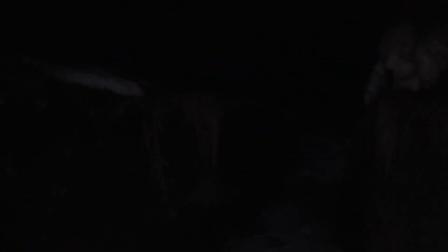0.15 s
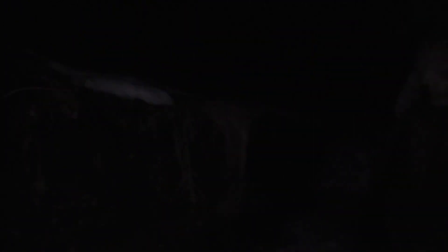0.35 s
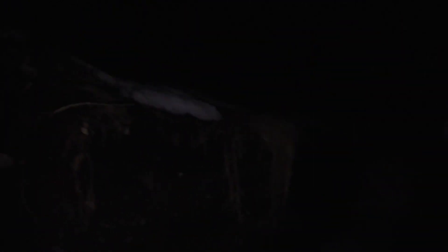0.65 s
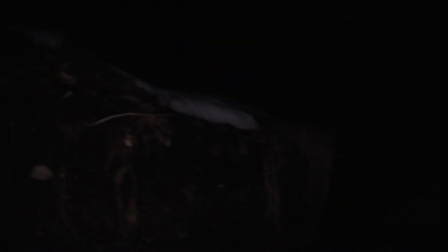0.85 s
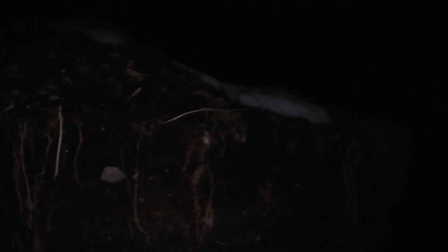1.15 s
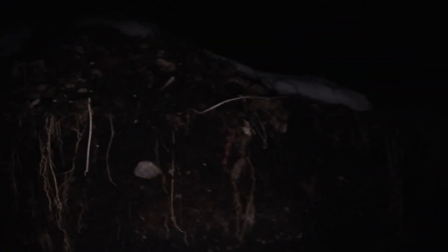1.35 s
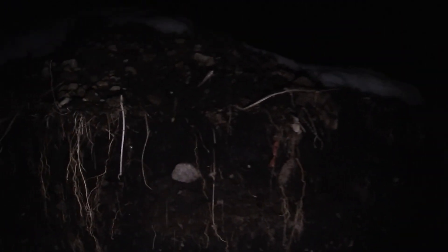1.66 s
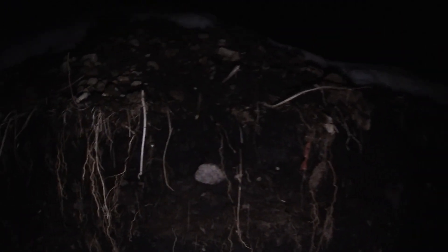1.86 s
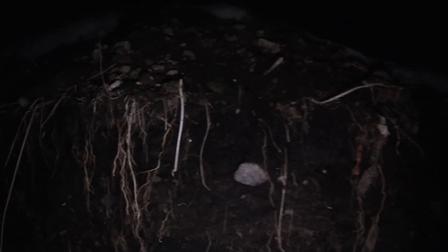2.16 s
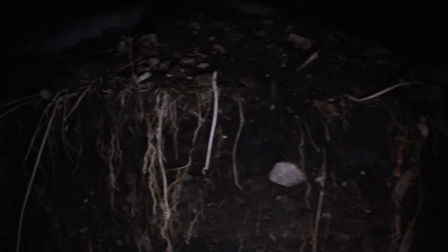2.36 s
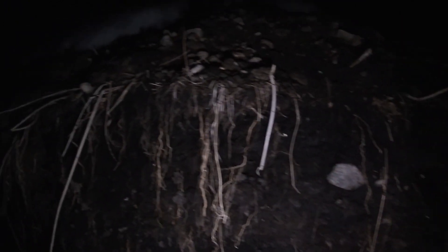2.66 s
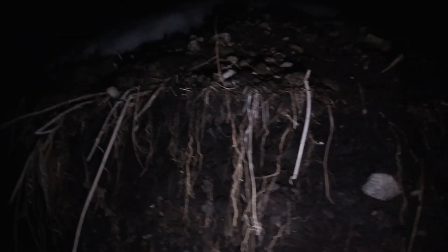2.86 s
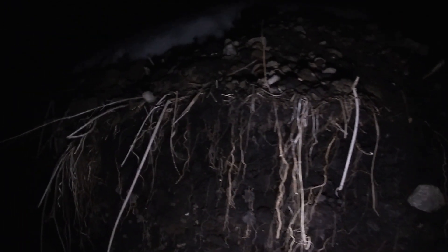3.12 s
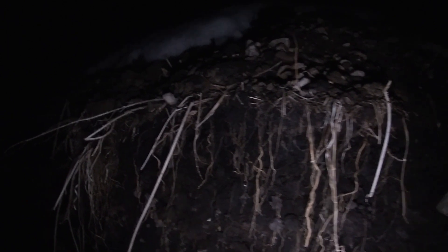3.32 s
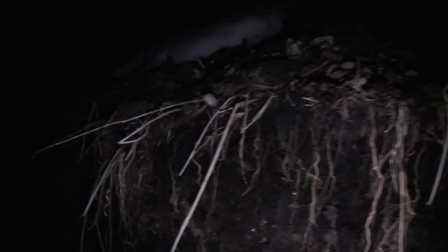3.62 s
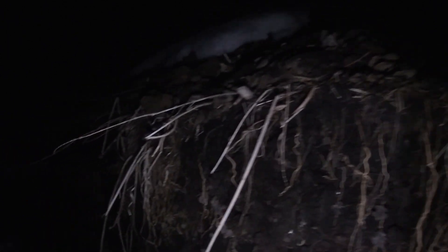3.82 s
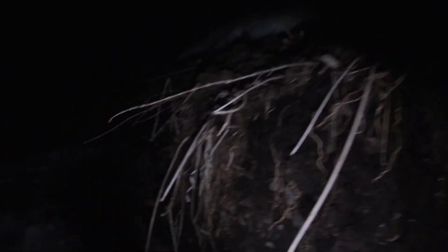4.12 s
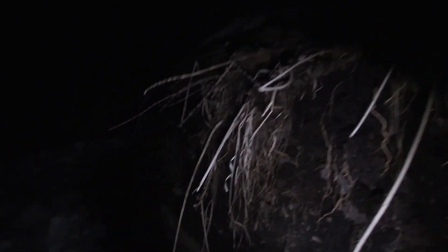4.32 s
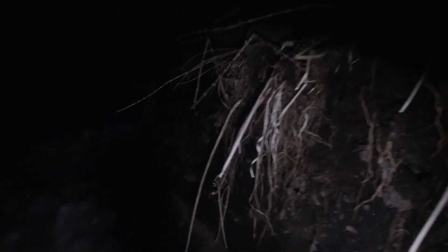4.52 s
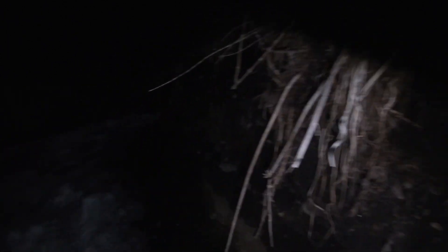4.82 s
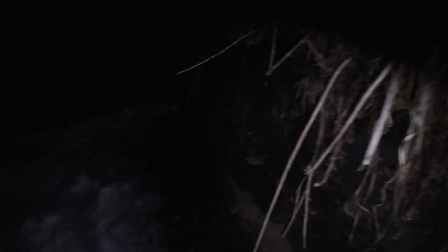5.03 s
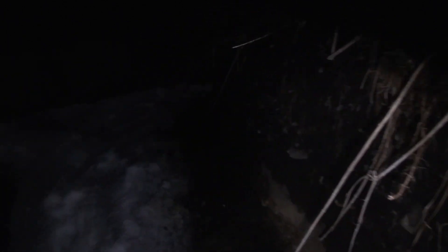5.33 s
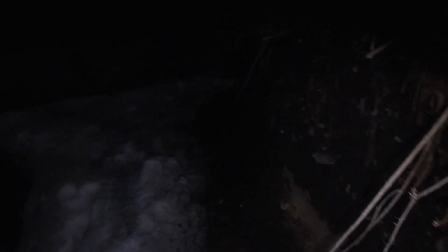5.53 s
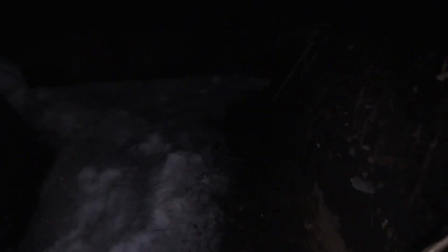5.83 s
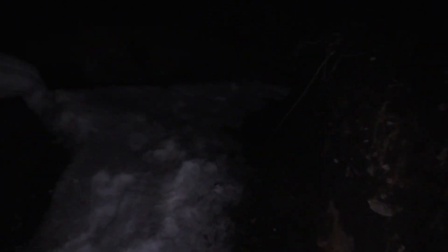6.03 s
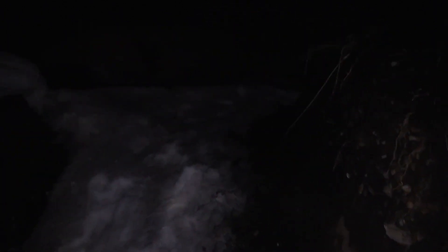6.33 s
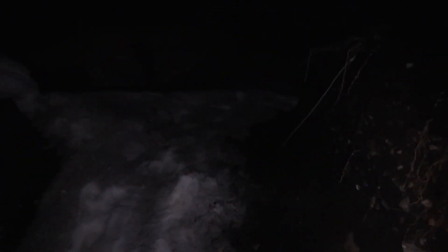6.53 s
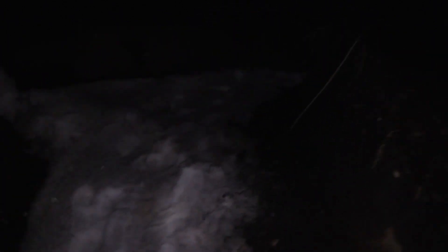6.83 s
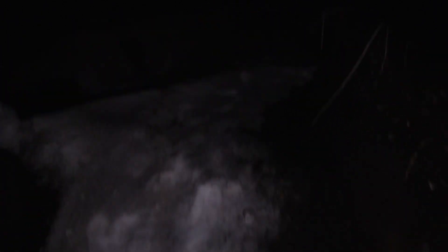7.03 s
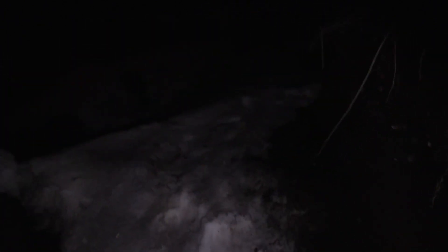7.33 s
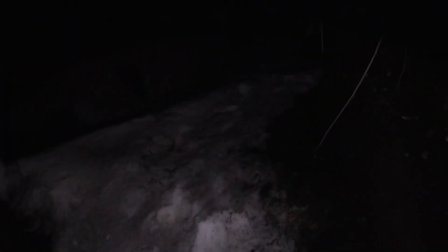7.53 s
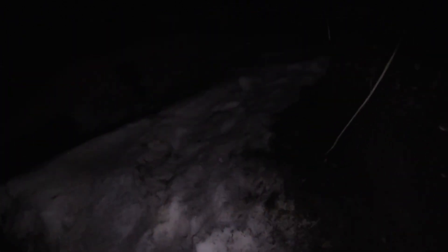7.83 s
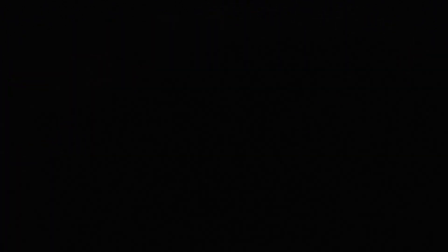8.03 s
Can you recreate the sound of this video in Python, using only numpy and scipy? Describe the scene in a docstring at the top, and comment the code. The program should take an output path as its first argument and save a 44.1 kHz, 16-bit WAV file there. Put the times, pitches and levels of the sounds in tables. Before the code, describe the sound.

Plastic taps, creaks and cloth rubs dominate, bunching into hard knocks past six seconds, before a boot crunches crust with brief hollow pops.

```python
"""A soft rub of fabric on plastic, then a creaking grip and the first taps: someone walks over snow and
frozen dirt with a small recorder in hand. Rubs, taps and creaks are clicks and grains of noise that excite
the modes of the plastic housing; thuds and hollow knocks are decaying sines and sway is low rumbling noise.
Boots crush the crust in bursts of banded grains, with ringing pops where hollows cave in.
A faint, patchy hiss of banded noise lies beneath; both channels carry the same sound."""
import sys
import numpy as np
from scipy import signal
from scipy.io import wavfile

SR = 44100
rng = np.random.default_rng(int(sys.argv[2]) if len(sys.argv) > 2 else 0)


def persist_wave(psi):
    """Save psi, clipped to +-1, as 16-bit WAV."""
    counts = np.round(np.clip(psi, -1, 1) * 32767).astype(np.int16)
    wavfile.write(sys.argv[1], SR, np.atleast_2d(counts).T)


N = 360341   # length in samples

# Strokes of fabric on the housing. Each row: start in seconds, swell in seconds, hold in seconds,
# ease in seconds, hold level in dB, press (shell part) in dB, grit (edge part) in dB, contact colour in Hz.
FABRIC_STROKES = [(0.1, 0.22, 0.024, .12, -57, 12, 2.5, 7800), (0.95, .01, 0.11, 0.083, -62.5, 1, -5, 4160),
                  (1.88, 0.3, 0.04, 0.2, -51, -20, -4.5, 4800),
                  (2.55, 0.33, 0.07, 0.07, -42.5, -7.5, -2.5, 5350),
                  (3.7, 0.058, 0.066, 0.07, -59, -7.5, 4.5, 4250),
                  (3.9, 0.065, 0.17, 0.012, -57, -1.5, -0.8, 4330),
                  (4.13, 0.062, 0.17, 0.01, -50, -1.5, 1.5, 5700),
                  (4.365, 0.015, 0.089, 0.072, -47.5, -1.5, -3, 5700),
                  (4.735, 0.0085, 0.06, 0.017, -51.5, 7.5, 1.1, 5570),
                  (4.97, 0.082, 0.054, 0.031, -58.5, -11, 2, 7600),
                  (5.155, 0.07, 0.022, 0.028, -49.5, 5.5, 0, 3650),
                  (5.795, 0.011, 0.12, 0.004, -53, 1, 4, 4250),
                  (5.915, 0.018, 0.011, 0.029, -48, -2.5, 5.5, 4250),
                  (5.975, 0.0055, 0.14, 0.012, -52.5, -4.5, 0.5, 5900),
                  (6.1, 0.0023, 0.0039, 0.055, -51, 1.5, 5.5, 4170),
                  (6.28, 0.007, .01, 0.13, -50.5, 4, 7, 4250),
                  (6.41, 0.0034, 0.0073, 0.037, -42, 6, 1.5, 4130),
                  (6.56, 0.0097, 0.027, 0.094, -62, 2, 16.5, 2940),
                  (6.645, 0.0051, 0.0051, 0.2, -43.5, 3, 3.5, 4160),
                  (6.82, 0.035, 0.046, 0.035, -49, 0.5, 6, 4500),
                  (7.13, 0.024, 0.044, 0.011, -50, 4.5, -5, 5900),
                  (8.1, 0.006, 0.063, 0.013, -56, -8, -0.5, 5600)]
RUB_SWELL_DB_PER_S, RUB_EASE_DB_PER_S = 95.5, 88   # slopes before and after the hold
SHELL_TOP_HZ, KNOCK_TOP_HZ = 400, 2000   # shell below the first, panels between, edges above


def rubbing():
    """Dense stick-slip of fabric on plastic: thousands of fibre clicks heard through the housing modes."""
    friction, press_db, grit_db, contact_hz = strokes(
        FABRIC_STROKES, RUB_SWELL_DB_PER_S, RUB_EASE_DB_PER_S, fade_s=0.0024)
    fibres = grains(4000, spread_db=2.0, clump_db=2.0, clump_hz=33.0)
    shell, knock, edge = housing([fibres] * 3, contact_hz, focus_db=8.5, grip_db=1.72, focus_octaves=0.095)
    body = from_db(press_db) * rms_one(shell)
    grit = from_db(grit_db) * rms_one(edge)
    return friction * (body + rms_one(knock) + grit)


def taps():
    """Each tap, snag or slip is a click with brief chatter; the shell is pushed more softly and later."""
    # Taps on the housing. Each row: start in seconds, strike in dB, shell push beside the strike in dB,
    # contact colour in Hz, chatter decay in seconds.
    tap_rows = [(0.4666, -36.5, -4, 2880, 0.0093), (0.6616, -36, -6, 4440, 0.0049),
                (0.8349, -28.5, -11.5, 4360, 0.0035), (0.9276, -28, -10.5, 4200, 0.0047),
                (1.071, -26.5, -12.5, 4480, 0.003), (1.7897, -10, -40.5, 4530, 0.0078),
                (1.832, -8, -74, 4700, 0.0015), (3.0807, -19, -12.5, 4050, 0.0035),
                (3.2999, -9, -29.5, 4600, 0.0059), (3.6884, -21.5, -16, 4300, 0.006),
                (4.2534, -21, -22, 4690, 0.0072), (5.7977, -17.5, -29, 4250, 0.0052),
                (6.4224, -22, -10.5, 3500, 0.0015), (6.4974, -6.5, -44, 5400, 0.0038),
                (6.6515, -7, -48, 4080, 0.017), (6.6876, -11, -27.5, 3830, 0.0062),
                (7.213, -16, -17.5, 3880, 0.0032), (7.356, -21.5, -53, 7060, 0.022),
                (7.75, -21, -24, 4770, 0.0032), (8.015, -25.5, -29, 2500, 0.014),
                (8.0796, -25, -26, 2760, 0.0057), (8.104, -11, -36, 5470, 0.0049)]
    # Threads that snag and let go with a faint tick. Each row: start in seconds, strike in dB.
    snag_rows = [(0.4369, -29.5), (0.696, -41.5), (1.0207, -44), (2.1935, -33), (2.438, -38), (3.2377, -33),
                 (6.967, -33)]
    snag_push_db, snag_hz, snag_chatter_s = -18.5, 2270, 0.0062
    panel_db, panel_follows = 22.5, 0.42   # panel drive over the strike; its share of the shell push in dB

    snags = [(at, db, snag_push_db, snag_hz, snag_chatter_s) for at, db in snag_rows]
    contacts = sorted(list(tap_rows) + slips() + snags)
    start, edge_db, push_db, contact_hz, chatter_s = np.transpose(contacts)
    shell_db = edge_db + push_db
    knock_db = edge_db + panel_db + panel_follows * push_db

    length = 1500   # samples in one contact
    t = np.arange(length) / SR
    decay = np.exp(-t / np.maximum(chatter_s, 3e-4)[:, None])
    chatter = rng.standard_normal((len(start), length)) * decay * 0.18
    chatter[:, 0] = np.minimum(0.004 / chatter_s, 1)   # long chatter starts less sharply
    push = rms_one(t * np.exp(-t / 0.0017))

    drives = np.full((3, N + length), 1e-18)
    for k, at in enumerate(np.round(start * SR).astype(int)):
        drives[0, at:at + length] += from_db(shell_db[k]) * push
        drives[1, at:at + length] += from_db(knock_db[k]) * chatter[k]
        drives[2, at:at + length] += from_db(edge_db[k]) * chatter[k]
    drives[1] = signal.lfilter([.08], [1, -.93], drives[1])   # panels feel a softer contact than edges
    drives[1] += from_db(14.5) * drives[0]   # and bend with the shell push

    latest = np.maximum(np.searchsorted(start, np.arange(N) / SR + 1e-4) - 1, 0)   # contact now heard
    above_shell = signal.butter(2, SHELL_TOP_HZ, "high", fs=SR, output="sos")
    direct = from_db(-19.5) * signal.sosfilt(above_shell, drives[1, :N])
    ringing = housing(drives[:, :N], contact_hz[latest], focus_db=17.0, grip_db=1.5, focus_octaves=0.14)
    return direct + sum(ringing)


def slips():
    """The grip creaks as a row of slips at its own pace, strongest in the middle; returns rows for taps."""
    # Creaks of the grip. Each row: first slip in seconds, end of the run in seconds, slips per second,
    # unevenness from 0 to 1, loudest strike in dB, shell push beside the strike in dB, chatter in seconds.
    creak_rows = [(0.301, 0.42, 88, .45, -26.5, -10.5, 0.0021),
                  (7.162, 7.202, 130, .06, -14, -20.5, 0.0012)]
    ends_db, slip_hz = -9.5, 4220   # softening toward the ends of a run; contact colour
    rows = []
    for first, last, per_s, uneven, db, push_db, chatter_s in creak_rows:
        gaps = 1 + uneven * rng.uniform(-1, 1, 30)
        times = first + np.append(0, np.cumsum(gaps)) / per_s
        for at in times[times <= last]:
            from_middle = 2 * (at - first) / (last - first) - 1
            rows.append((at, db + ends_db * from_middle ** 2, push_db, slip_hz, chatter_s))
    return rows


def housing(drives, contact_hz, focus_db, grip_db, focus_octaves):
    """Shell, panel and edge modes of the plastic; the shifting grip frees or damps each one in turn."""
    # Modes of the housing. Each row: centre in Hz, width of one resonator pass in Hz, level in dB.
    modes = [(125, 158, -4), (183.3, 60, 9), (238, 190, -3.5), (451.5, 166, -10.5), (712, 144, 0),
             (1034, 360, -8), (1391, 333, 3.5), (2200, 990, -6.5), (2870, 455, -3.5), (3650, 490, 0.2),
             (4267, 470, -6), (5060, 480, -3), (5554, 430, -5), (6307, 1010, -1), (7790, 810, -6),
             (9250, 1640, -15.5), (12400, 11000, -28.5)]
    parts = [0, 0, 0]
    for k, (hz, width_hz, level_db) in enumerate(modes):
        part = part_of(hz)
        gain = from_db(level_db + grip_db * drift(2.3))
        ring = (-1) ** k * gain * resonance(drives[part], hz, width_hz)
        if part == 2:   # edge modes near the contact colour ring most
            octaves_off = np.log2((contact_hz + 1) / hz)
            ring = ring * from_db(focus_db * np.exp(-(octaves_off / focus_octaves) ** 2))
        parts[part] = parts[part] + ring
    return parts


def thuds_and_knocks():
    """Each thud or knock of the housing is a decaying sine that builds quickly."""
    # Low thuds and short hollow knocks of the housing. Each row: start in seconds, level in dB,
    # pitch in Hz, 60 dB decay in seconds (0.03 at least).
    thud_rows = [(0.33, -31.5, 63, 0.3), (2.83, -40.5, 59.7, 0.32), (3.684, -27.5, 52.7, 0.25),
                 (4.1, -32.5, 256, 0.087), (4.253, -27, 267, 0.033), (4.745, -34.5, 44, 0.24),
                 (4.849, -36.5, 26.1, 0.7), (5.328, -37.5, 200, 0.074), (5.806, -34, 60.5, 0.15),
                 (6.107, -14, 61.5, 0.17), (6.288, -18.5, 72, 0.094), (6.415, -18, 103, 0.086),
                 (6.437, -13, 61, 0.1), (6.513, -12, 38.5, 0.073), (7.117, -23, 43, 0.15)]
    out, t = np.zeros(N), np.arange(SR // 3) / SR
    for start, level_db, hz, t60 in thud_rows:
        onset = 1 - np.exp(-t * hz / 0.75)
        decay = from_db(level_db - 60 * t / max(t60, .03))
        at = round(start * SR)
        out[at:at + len(t)] -= np.sin(2 * np.pi * hz * t) * onset * decay
    return out


def crunch():
    """Boots break fine ice crystals by the thousand; fewer clods and pores give way under them."""
    # Boots in crust and dirt. Each row: start in seconds, swell in seconds, hold in seconds,
    # ease in seconds, hold level in dB, weight (low part) in dB, grit (high part) in dB.
    boot_rows = [(1.35, 0.047, 0.0067, 0.035, -42, -2.5, 6.5), (1.437, 0.035, 0.035, 0.013, -44.5, 4, 5.5),
                 (1.525, 0.003, 0.021, 0.067, -50, 1.5, -1.5), (1.607, 0.02, 0.055, 0.011, -51.5, -7, -3.5),
                 (1.72, 0.0065, .11, 0.02, -57, 0, 0), (3.23, 0.013, 0.15, 0.067, -56, -7, -3.5),
                 (3.43, 0.015, 0.28, .01, -60, -14, -4), (5.56, 0.021, 0.024, 0.032, -49.5, -7, 0),
                 (5.64, 0.0053, 0.2, 0.015, -57, -2, -3), (6.94, 0.013, 0.087, 0.17, -49, -13, -1.5),
                 (7.23, 0.018, 0.36, 0.1, -57, -16, -1), (7.664, 0.022, 0.046, 0.0067, -34.5, -1, -7),
                 (7.777, 0.0022, 0.093, 0.014, -46, -8, -5),
                 (7.866, 0.0013, 0.0082, 0.0072, -41.5, 0, -3.5)]
    # Colour of the breaking crust. Each row: frequency in Hz, relative level in dB per Hz.
    crust_colour = [(100, -65), (152, -19.5), (367, -11), (620, -16.5), (1000, -10), (1400, -15.5),
                    (2400, -12.5), (4000, -16), (7510, -13), (10500, -49), (15000, -27)]
    swell_db_per_s, ease_db_per_s = 281, 149
    crushing, weight_db, grit_db = strokes(boot_rows, swell_db_per_s, ease_db_per_s, fade_s=.005)
    crystals = grains(3000, spread_db=1.5, clump_db=2.0, clump_hz=82.0)
    clods = grains(300, spread_db=3.0, clump_db=2.5, clump_hz=35.7) + 0.91 * crystals
    low, middle, high = coloured([clods, clods, crystals], crust_colour, patchy_db=2.44)
    weight = from_db(weight_db) * rms_one(low)
    grit = from_db(grit_db) * rms_one(high)
    return crushing * (weight + rms_one(middle) + grit)


def pops():
    """Hollows in the crust cave in under the boot: each snaps and rings briefly near one pitch."""
    # Caving hollows. Each row: start in seconds, level in dB.
    pop_rows = [(7.725, -24), (7.734, -21.5), (7.781, -27), (7.797, -30), (7.81, -32), (7.845, -30),
                (7.867, -19)]
    hollow_hz, hollow_t60_s, snap_db = 870, 0.02, -11.5   # the ring; the snap of ice beside it
    out, t = np.zeros(N), np.arange(SR // 20) / SR
    for start, level_db in pop_rows:
        chance = rng.standard_normal(len(t))
        hz = hollow_hz * (1 + 0.068 * chance[0])
        fade = from_db(-60 * t / hollow_t60_s) * np.minimum(t * hollow_hz, 1)
        ring = np.sin(2 * np.pi * hz * t) * fade
        snap = from_db(snap_db) * rms_one(resonance(chance, 1700, 3600)) * np.exp(-t / 0.0009)
        at = round(start * SR)
        out[at:at + len(t)] += from_db(level_db) * (ring + snap)
    return out


def sway():
    """Lumpy low pressure on the microphone from the carrying hand; pressing strokes shake it more."""
    # Rumble of the carrying hand, joined by straight lines. Each row: time in seconds, level in dB.
    rumble_points = [(0.0, -64), (0.41, -66), (1.59, -73), (5.96, -55.5), (6.32, -37), (7.78, -67),
                     (8.17, -50.5)]
    lump_band = signal.butter(3, [15, 55], "band", fs=SR, output="sos")
    lumps = signal.sosfilt(lump_band, rng.standard_normal(N))
    time_s, level_db = np.transpose(rumble_points)
    carrying_db = np.interp(np.arange(N) / SR, time_s, level_db) + 1.4 * drift(3.7)
    carrying = from_db(carrying_db) * rms_one(lumps)

    friction, press_db = strokes(FABRIC_STROKES, RUB_SWELL_DB_PER_S, RUB_EASE_DB_PER_S, fade_s=0.043)[:2]
    shake_band = signal.butter(2, [20, 90], "band", fs=SR, output="sos")
    shakes = signal.sosfilt(shake_band, rng.standard_normal(N))
    return carrying + friction * from_db(press_db - 10.5) * rms_one(shakes)


def faint_hiss():
    """Steady noise split into bands that flicker one by one."""
    # Colour of the hiss. Each row: frequency in Hz, relative level in dB per Hz.
    hiss_colour = [(90, -29), (166, 4), (553, -10.5), (728, -1.5), (1340, -5.5), (2330, -13.5),
                   (5770, -10.5), (7750, -14), (14000, -42)]
    noise = rng.standard_normal(N)
    return from_db(-64) * rms_one(sum(coloured([noise] * 3, hiss_colour, patchy_db=4.0)))


def strokes(rows, swell_db_per_s, ease_db_per_s, fade_s):
    """Gain swells, holds, eases, then stops and leaves a faint settling; other columns hold per stroke."""
    start, swell_s, hold_s, ease_s, hold_db, *columns = np.transpose(rows)
    t = np.arange(N) / SR
    k = np.maximum(np.searchsorted(start, t) - 1, 0)   # latest stroke at each sample
    held = t - (start + swell_s)[k]   # negative during the swell
    swell_db = swell_db_per_s * np.minimum(held, 0)
    ease_db = ease_db_per_s * np.maximum(held - hold_s[k], 0)
    sounding = (t >= start[k]) * (held <= (hold_s + ease_s)[k])
    gain = from_db(hold_db[k] + swell_db - ease_db) * sounding
    settling = from_db(-12.5) * lag(gain, 0.067)
    gain = np.maximum(lag(gain, fade_s), settling)
    return [gain] + [lag(c[k], fade_s) for c in columns]


def grains(per_s, spread_db, clump_db, clump_hz):
    """Random clicks of uneven size and either sign that come in louder and softer clumps; rms 1."""
    sizes = from_db(spread_db * np.minimum(rng.exponential(1, N), 5)) * rng.choice([-1, 1], N)
    struck = rng.random(N) < per_s / SR
    clumps = from_db(clump_db * drift(clump_hz))
    return rms_one(sizes * struck * clumps + 1e-9)


def coloured(sources, spectrum, patchy_db):
    """Half-octave bands, each at its own level and flicker; low, middle and high parts have a source each."""
    parts = [0, 0, 0]
    edges = 100 * 2 ** np.arange(0, 7.6, .5)
    point_hz, point_db = np.transpose(spectrum)
    for k, (low, high) in enumerate(zip(edges, edges[1:])):
        hz = np.sqrt(low * high)
        part = part_of(hz)
        level_db = np.interp(np.log(hz), np.log(point_hz), point_db)
        gain = from_db(level_db + patchy_db * drift(12.6))
        band_filter = signal.butter(2, [low, high], "band", fs=SR, output="sos")
        band = signal.sosfilt(band_filter, sources[part])
        parts[part] = parts[part] + (-1) ** k * gain * band
    return parts


def part_of(hz):
    """Sort by pitch: 0 bends the whole body, 1 its panels, 2 its edges and grit."""
    return int(hz > SHELL_TOP_HZ) + int(hz > KNOCK_TOP_HZ)


def resonance(x, hz, width_hz):
    """A two-pole peak taken twice: gain about 1 on top, dark valleys beside it."""
    r = np.exp(-np.pi * width_hz / SR)
    section = [(1 - r * r) / 2, 0, (r * r - 1) / 2, 1, -2 * r * np.cos(2 * np.pi * hz / SR), r * r]
    return signal.sosfilt([section, section], x)


def drift(rate_hz):
    """Slow chance of rms 1: smoothed noise made at every 40th sample and joined by straight lines."""
    r = np.exp(-80 * np.pi * rate_hz / SR)
    noise = rng.standard_normal(N // 40 + 2002)
    slow = signal.lfilter([1], [1, -2 * r, r * r], noise)[2000:]   # without the run-in
    return np.interp(np.arange(N) / 40, np.arange(len(slow)), rms_one(slow))


def lag(x, seconds):
    """One-pole smoothing."""
    r = np.exp(-1 / (seconds * SR))
    return signal.lfilter([1 - r], [1, -r], x)


def from_db(db):
    """Decibels to gain."""
    return 10 ** (np.asarray(db) / 20)


def rms_one(x):
    """Scale to rms 1."""
    return x / np.sqrt(np.mean(x ** 2) + 1e-20)


def scene():
    """All sources reach one microphone capsule, heard alike on both channels."""
    handling = rubbing() + taps() + thuds_and_knocks()
    boots = crunch() + pops()
    mono = handling + boots + sway() + faint_hiss()
    return np.array([mono, mono])


def record(dry):
    """The small microphone port dulls the top, which is then cut steeply."""
    port = signal.sosfilt(signal.butter(2, 9000, fs=SR, output="sos"), dry)
    return signal.sosfilt(signal.cheby2(12, 70, 15700, fs=SR, output="sos"), port)


dry = scene()
out = record(dry)
persist_wave(out)
```